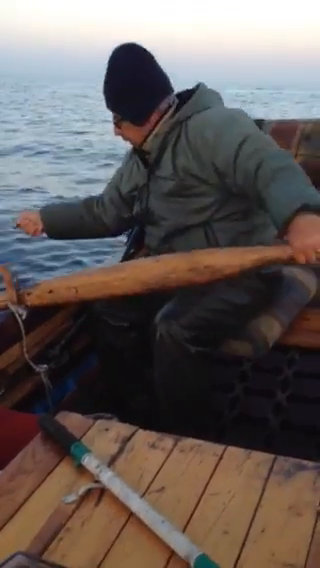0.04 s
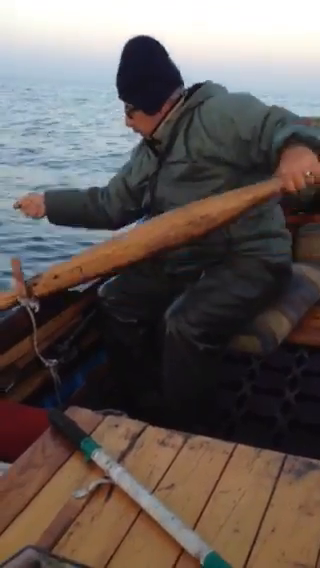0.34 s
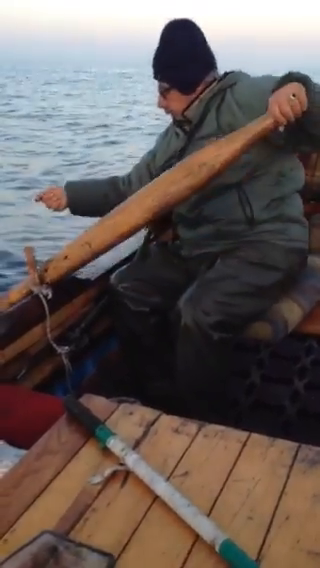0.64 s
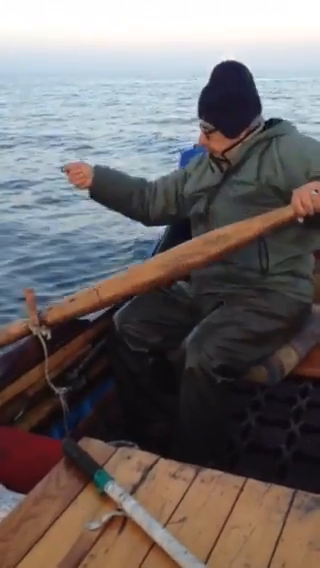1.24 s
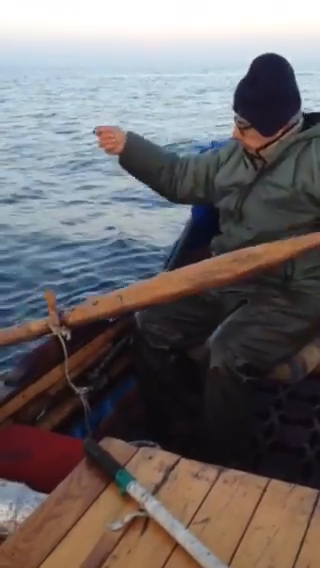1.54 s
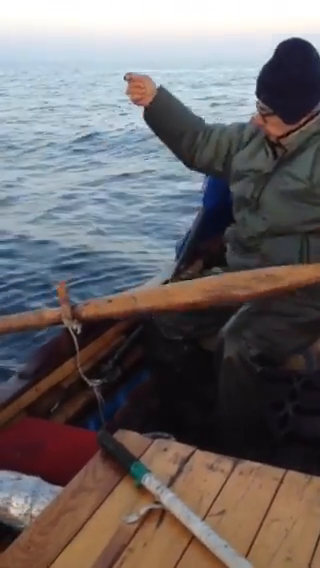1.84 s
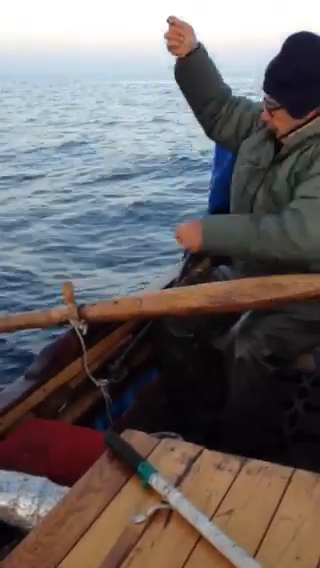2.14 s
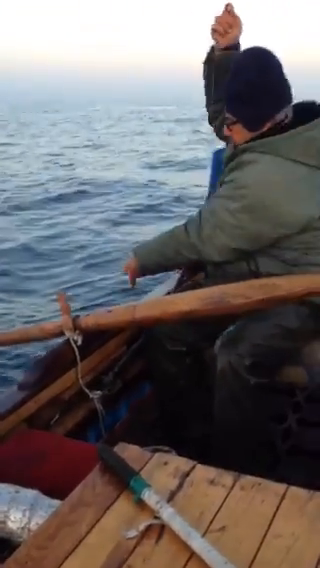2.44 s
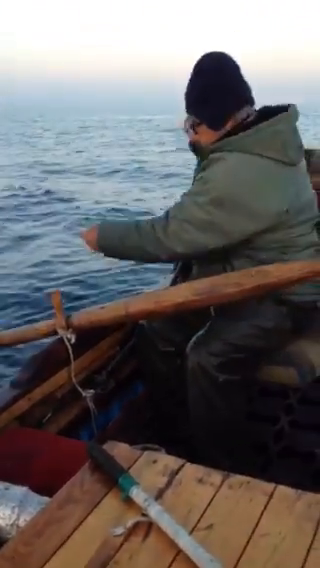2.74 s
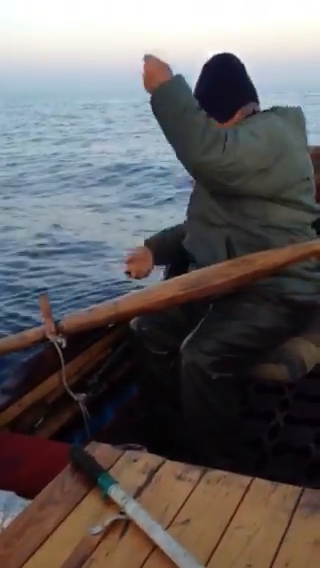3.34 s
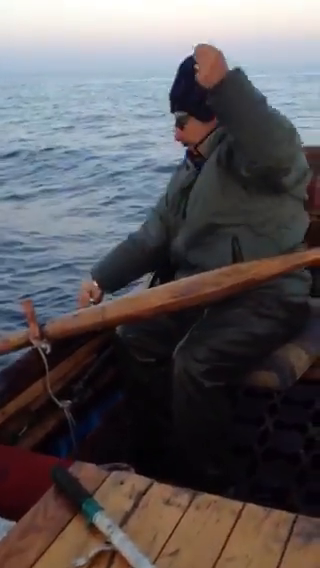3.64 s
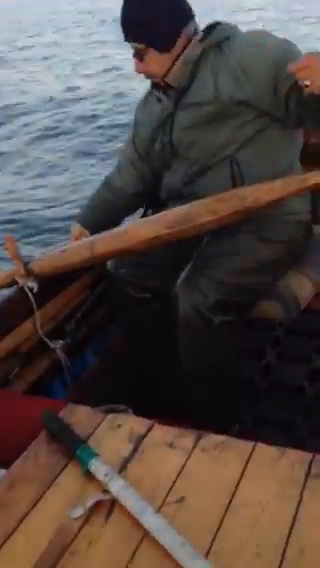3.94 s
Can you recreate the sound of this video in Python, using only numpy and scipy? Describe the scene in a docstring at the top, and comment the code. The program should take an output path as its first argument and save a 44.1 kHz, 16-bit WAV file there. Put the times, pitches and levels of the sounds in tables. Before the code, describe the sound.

A slow one-cylinder engine thuds softly over a low rumble, heard from inside a wooden boat on open water. Planks knock, wavelets splash against the side, then jacket sleeves swish and something bumps the hull heavily.

```python
"""On open water, in a wooden boat: a slow one-cylinder engine thuds softly under a low rumble.
Each thud is a puff of gas that makes the exhaust ring. Things bump on the hull, once heavily,
and the planks ring. Wavelets lap, plip and splash against the side with bubbles and spray.
The sleeves of a jacket swish, cloth rubbing on cloth, as a fishing line is hauled in."""
import sys
import numpy as np
from scipy import signal
from scipy.fft import rfft, irfft
from scipy.io import wavfile

SR = 44100
rng = np.random.default_rng(int(sys.argv[2]) if len(sys.argv) > 2 else 0)


def transcribe(signal):
    """Save signal, clipped to [-1, 1], as a 16-bit WAV file at the path in sys.argv[1]."""
    frames = np.atleast_2d(signal).T
    limited = np.clip(frames, -1, 1)
    pcm = np.round(limited * 32767).astype(np.int16)
    wavfile.write(sys.argv[1], SR, pcm)


N = 176400  # 4 seconds


def undb(db):
    """Turn decibels into a number to multiply by."""
    return 10 ** (np.asarray(db) / 20)


def unit(x):
    """Scale a sound so that its average strength (rms) is 1."""
    return x / np.sqrt(np.mean(x ** 2) + 1e-20)


def peak(x, db):
    """Scale a sound so that its highest point is at the given level."""
    return x * undb(db) / (np.abs(x).max() + 1e-20)


def curve(rows):
    """Join (time_s, value) rows by straight lines."""
    return np.interp(np.arange(N) / SR, *np.array(rows).T)


def add(out, start_s, sound):
    """Mix a sound in at the given time."""
    i = int(np.clip(start_s * SR, 0, N))
    out[i:i + len(sound)] += sound[:N - i]


def noise(spectrum):
    """Noise of strength 1, its lows and highs shaped by (pitch_hz, relative_db) rows."""
    hz, db = np.array(spectrum).T
    freqs = np.maximum(np.fft.rfftfreq(N, 1 / SR), 1)
    gain = undb(np.interp(np.log(freqs), np.log(hz), db))
    return unit(irfft(rfft(rng.standard_normal(N)) * gain, N))


def soft_band(x, hz, width):
    """Keep the sound near one pitch by filtering twice; width is a share of that pitch."""
    b, a = signal.iirpeak(min(hz, SR / 3), 1 / max(width, .05), fs=SR)
    return signal.lfilter(b, a, signal.lfilter(b, a, x))


def flutter(rate_hz, depth_db):
    """A volume that wanders smoothly up and down at random."""
    return undb(depth_db * noise([(1, 0), (rate_hz, 0), (2 * rate_hz, -100)]))


def swell(peak_s, rise_s, fall_s):
    """A bell-shaped rise and fall."""
    t = np.arange(N) / SR - peak_s
    return np.exp(-(t / np.where(t < 0, rise_s, fall_s)) ** 2)


def fade(t, fade_s):
    """A volume that holds until time 0, then drops 60 dB every fade_s."""
    return np.exp(-np.log(1000) * np.maximum(t, 0) / fade_s)


def strike(tones, hz, spread_octaves, rise_s, rattle_db):
    """A soft push rings an object's own tones, favouring those near hz, with a short rattle."""
    t = np.arange(SR // 5) / SR - rise_s
    ring = 0
    for tone_hz, db, fade_s in tones:
        strength = undb(db) * np.exp(-(np.log2(tone_hz / hz) / spread_octaves) ** 2)
        detuned_hz = tone_hz * (1 + 0.034 * rng.standard_normal())
        ring += strength * fade(t, fade_s) * np.cos(2 * np.pi * detuned_hz * t)
    rattle = soft_band(rng.standard_normal(len(t)), hz, width=0.92) * fade(t, 0.081)
    rattle = signal.sosfilt(signal.butter(4, min(2.6 * hz, SR / 4), fs=SR, output="sos"), rattle)
    soft_start = np.cos(np.pi / 2 * np.minimum(t / rise_s, 0)) ** 2
    return (peak(ring, 0) + peak(rattle, rattle_db)) * soft_start


def bubble(hz, cycles):
    """A ringing bubble whose pitch rises 16% as it dies away."""
    life_s = cycles / hz
    t = np.arange(int(SR * life_s) + 2) / SR
    tone = np.sin(2 * np.pi * hz * t * (1 + .16 * t / life_s / 2))
    soft_start = 1 - np.exp(-t * hz / 2)
    return tone * fade(t, life_s) * soft_start


def open_water():
    """An uneven low rumble under the faint steady hiss of open air."""
    # lows and highs of the rumble and of the air: pitch_hz, relative_db
    rumble_shape = [(15, -20), (30, -18), (50, -4), (75, 0.5), (125, 0.5), (165, -7), (220, -12),
                    (300, -16), (420, -24), (700, -34), (1500, -71), (4000, -69)]
    air_shape = [(100, -9), (700, 1.5), (1200, -6.5), (2200, -15), (3000, -11), (4500, -9.5), (7000, -9.5),
                 (11000, -10.5), (16000, -12)]
    # how loud the rumble is: time_s, level_db
    rumble_levels = [(0, -46), (.2, -39.5), (.35, -44.5), (1, -47), (1.3, -48), (1.8, -46), (2.7, -48),
                     (3.5, -49), (3.7, -41.5), (3.85, -46.5), (4, -43)]
    rumble = unit(noise(rumble_shape) * flutter(rate_hz=9, depth_db=4.07))
    return rumble * undb(curve(rumble_levels)) + undb(-66.5) * noise(air_shape)


def lapping():
    """Small bubbles and ticks of spray over a watery wash; all swell with each wavelet."""
    # the wash between the bubbles: pitch_hz, relative_db
    wash_shape = [(300, -1.5), (750, 1.5), (1000, -15), (1350, 1), (2200, -5), (2800, -7), (3600, -6),
                  (4600, -8), (6000, -13.5), (15000, -20.5)]
    # rise and fall of the wavelets: time_s, gain_db
    wavelets = [(0, -70), (.4, -64.5), (.75, -65.5), (1.05, -70), (1.35, -62.5), (1.6, -57.5), (1.8, -60),
                (2.03, -52.5), (2.13, -59.5), (2.3, -53.5), (2.52, -58.5), (2.75, -66), (3.2, -64),
                (4, -58)]
    bubbles_per_s, ticks_per_s = 600, 220
    wash = unit(noise(wash_shape) * flutter(rate_hz=30, depth_db=0.5))
    tick_starts = rng.random(N) < ticks_per_s / SR
    tick_sizes = undb(3.5 * np.minimum(rng.exponential(size=N), 4))
    ticks = unit(soft_band(tick_starts * tick_sizes, hz=4510, width=1.0))
    bubbles = np.zeros(N)
    for when, dice_a, dice_b, rarity in rng.random((int(bubbles_per_s * N / SR), 4)):
        octaves = 0.819 * np.sqrt(6) * (dice_a + dice_b - 1)  # middle pitches come most often
        hz = min(2040 * 2 ** octaves, SR / 4)
        db = -4.5 * np.log(max(rarity, 1 / 50))  # many quiet, a few loud
        add(bubbles, when * N / SR, bubble(hz, cycles=30) * undb(db))
    return (undb(-5) * unit(bubbles) + undb(-7) * wash + undb(-14) * ticks) * undb(curve(wavelets))


def splashes():
    """Nearby bubbles plip, and slaps of water burst into a crackle of spray."""
    # single bubbles: start_s, relative_db, pitch_hz
    plips = [(.162, -55, 2240), (.191, -48.5, 995), (.317, -57, 833), (0.355, -46, 1424),
             (0.425, -50, 2240), (.772, -49.5, 1236), (1.115, -51, 1310), (1.257, -52, 2070),
             (1.487, -46.5, 2080), (1.57, -44, 1096), (1.596, -44.5, 916), (1.603, -42.5, 1890),
             (1.844, -40, 2470), (1.894, -49, 1586), (1.982, -42.5, 1950), (2.016, -34, 1250),
             (2.024, -44, 1440), (2.044, -42, 797), (2.062, -38.5, 2220), (2.106, -44.5, 1840),
             (2.277, -43.5, 770), (2.29, -55, 1140), (2.482, -43.5, 1380), (2.505, -46.5, 1840),
             (2.596, -47.5, 1395)]
    # slaps on the boat's side: start_s, level_db, pitch_hz, width (share of the pitch), fade_s
    slaps = [(0.162, -48, 3520, 1.7, 0.02), (.357, -48.5, 1900, 0.33, 0.013),
             (.381, -47.5, 7000, 0.82, 0.0043), (0.427, -47, 4500, 1.4, 0.005),
             (0.5, -49.5, 6500, 0.51, 0.0054), (0.633, -51.5, 4460, 0.33, 0.013),
             (1.413, -46, 7640, 0.98, 0.0093), (1.521, -51, 3970, 0.21, .02), (1.56, -47, 4020, 1.4, 0.026),
             (1.571, -42.5, 1050, 1.26, 0.064), (1.592, -42, 1390, 1.1, 0.14),
             (1.619, -50.5, 4430, .9, 0.029), (1.7, -38.5, 1840, .4, 0.021), (1.826, -43, 4000, 1.2, 0.014),
             (1.842, -39.5, 7300, 1.1, 0.0042), (1.921, -39, 4370, 0.22, 0.01),
             (1.930, -32, 4370, 0.32, 0.011), (1.933, -37.5, 1640, 0.86, 0.036),
             (1.962, -49, 5000, 1.2, 0.013), (1.979, -42.5, 4300, 1.8, 0.015),
             (1.996, -43, 5100, 1.4, 0.025), (2.019, -38, 1410, 0.98, 0.07), (2.036, -34, 2800, 1.8, 0.017),
             (2.043, -39.5, 3760, 0.64, 0.091), (2.045, -36.5, 860, 1.6, 0.036),
             (2.062, -45, 2780, 1.3, 0.028), (2.277, -41, 1080, 1.1, 0.093), (3, -49, 1460, 0.63, 0.021)]
    out, t = np.zeros(N), np.arange(SR // 6) / SR
    for start_s, db, hz in plips:
        add(out, start_s, peak(bubble(hz, cycles=55), db - 4))
    rise_s, graininess = .0015, .7
    for start_s, db, hz, width, fade_s in slaps:
        spray = rng.standard_normal(len(t)) * np.exp(graininess * rng.standard_normal(len(t)))
        burst = (1 - np.exp(-t / rise_s)) * fade(t, fade_s)
        add(out, start_s, peak(soft_band(spray * burst, hz, width), db))
    return out


def jacket():
    """Cloth rubs on cloth with each pull of the arm; a rush of air leads into the heavy bump."""
    # the cloth's rub and its fine hiss: pitch_hz, relative_db
    rub_shape = [(200, 22), (700, 4.5), (1300, 3.5), (2200, 5.5), (2900, 1.5), (4400, 3.5), (6500, -5.5),
                 (10000, -29), (16000, -50)]
    hiss_shape = [(500, -36), (2500, -32), (4500, 2.5), (7000, 3.5), (10000, 2.5), (15000, -2.5)]
    # sleeve swishes: peak_s, level_db, rise_s, fall_s, hiss_db (compared with the rub)
    swishes = [(2.22, -60, .07, 0.05, -2.5), (2.35, -60, 0.077, 0.11, -4),
               (3.004, -50.5, 0.0051, 0.008, -12), (3.12, -65, 0.29, 0.066, -9),
               (3.3, -65.5, 0.033, 0.036, -11), (3.56, -51, 0.26, 0.059, -24),
               (3.63, -53.5, 0.055, 0.037, -1.5), (3.735, -54, 0.059, 0.049, -5),
               (3.87, -56.5, 0.3, 0.11, -25)]
    rub, hiss = noise(rub_shape), noise(hiss_shape)
    cloth = sum(undb(db) * swell(peak_s, rise_s, fall_s) * (rub + undb(hiss_db) * hiss)
                for peak_s, db, rise_s, fall_s, hiss_db in swishes)
    air = unit(soft_band(rng.standard_normal(N), hz=990, width=1.75))
    whoosh = undb(-45) * air * swell(peak_s=3.603, rise_s=0.042, fall_s=0.019)
    return cloth * flutter(rate_hz=20, depth_db=1.5) + whoosh


def hull_bumps():
    """Soft and hard bumps ring the same wooden planks."""
    # the hull's own tones: pitch_hz, relative_db, fade_s
    plank_tones = [(98.5, 3.5, 0.11), (142.6, -1, 0.22), (168.7, 4, 0.15), (218.4, 6.5, 0.078),
                   (268, -5.5, 0.18), (289, -4, .1), (376, -4, 0.04), (434, -6.5, 0.087), (509, -1, 0.042),
                   (640, -6, 0.03)]
    # bumps on the hull: start_s, level_db, favoured_pitch_hz
    bumps = [(.001, -29.5, 199), (.020, -24.5, 229), (.042, -32, 190), (0.079, -33, 207), (0.094, -26, 97),
             (.122, -27.5, 185), (.131, -28, 380), (0.177, -34, 198), (.213, -39, 190), (0.268, -33.5, 156),
             (0.397, -31.5, 250), (0.501, -34, 107), (1.386, -34, 118), (1.835, -34.5, 69),
             (1.91, -41, 109), (2.302, -33.5, 100), (2.446, -35, 152), (2.762, -39, 252),
             (2.863, -40.5, 420), (3.154, -35, 142), (3.591, -26, 140), (3.599, -11.5, 196),
             (3.608, -23, 173), (3.615, -21, 253), (3.679, -35, 120), (3.697, -30, 91), (3.747, -34.5, 169),
             (3.789, -32.5, 167)]
    out = np.zeros(N)
    for start_s, db, hz in bumps:
        knock = strike(plank_tones, hz, spread_octaves=0.53, rise_s=0.005045, rattle_db=-10.5)
        add(out, start_s, peak(knock, db))
    return out


def engine():
    """Each firing is one short puff through the exhaust, no two alike; the engine slows a little."""
    # engine speed: time_s, firings_per_s
    speeds = [(0, 10.374), (1.6, 9.727), (4, 9.357)]
    # the exhaust's own tones: pitch_hz, relative_db, fade_s
    exhaust_tones = [(121, -9.5, 0.17), (262, 7, 0.039), (511, 1.5, 0.033), (783, -14, 0.069)]
    # how loud a typical puff is: time_s, level_db
    puff_levels = [(0, -41.5), (.85, -38.5), (1.4, -38.5), (2.0, -36), (2.25, -39), (2.6, -40),
                   (3.15, -36.5), (4, -38.5)]
    first_firing_s, jitter_s = .027, 0.00089
    out, t = np.zeros(N), np.arange(N) / SR
    cycles = np.cumsum(curve(speeds)) / SR
    cycles -= np.interp(first_firing_s, t, cycles)
    for start_s in np.interp(np.arange(int(cycles[-1]) + 1), cycles, t):  # one firing per cycle
        extra_db, brightness, lateness = rng.standard_normal(3)
        hz = 326 * 2 ** (0.11 * brightness)
        puff = strike(exhaust_tones, hz, spread_octaves=1.08, rise_s=0.00551, rattle_db=-8.5)
        db = np.interp(start_s, *np.array(puff_levels).T) + extra_db
        add(out, start_s + jitter_s * lateness, peak(puff, db))
    return out


def scene():
    """Everything as heard from inside the boat, in one channel."""
    return (open_water() + engine() + hull_bumps() + jacket() + splashes() + lapping())[None]


def record(dry):
    """Cut away the highest treble, above 15400 Hz."""
    return signal.sosfilt(signal.ellip(10, .2, 70, 15400, fs=SR, output="sos"), dry)


dry = scene()
out = record(dry)
transcribe(out)
```